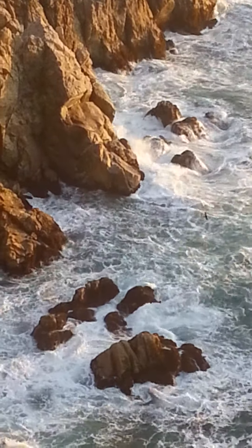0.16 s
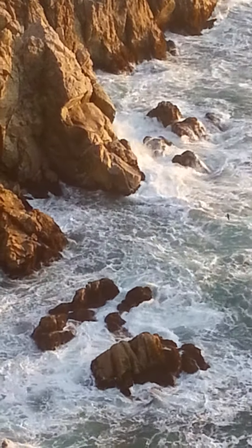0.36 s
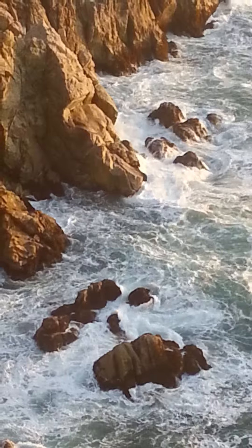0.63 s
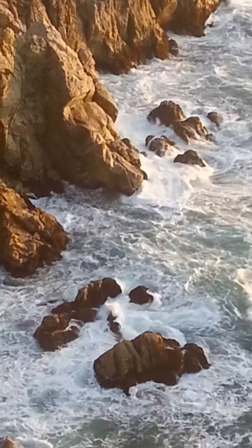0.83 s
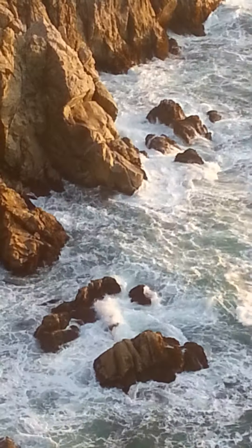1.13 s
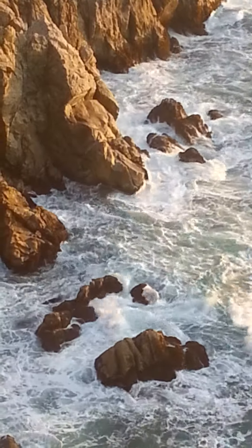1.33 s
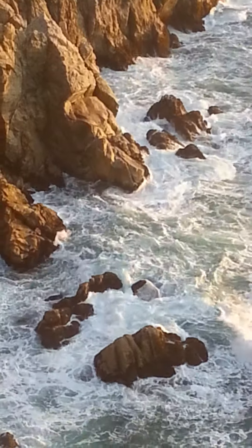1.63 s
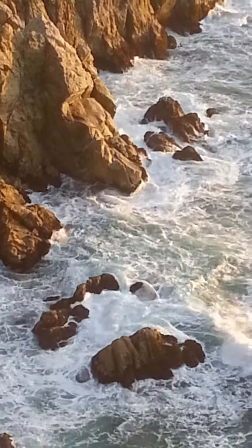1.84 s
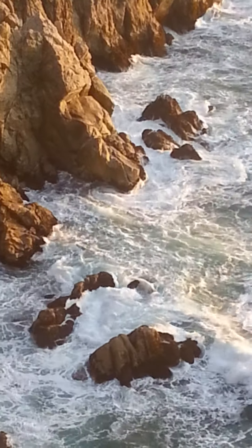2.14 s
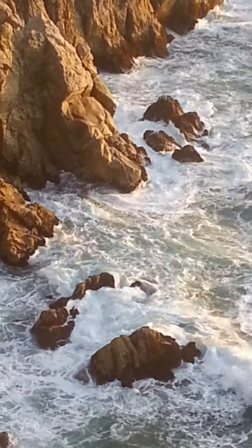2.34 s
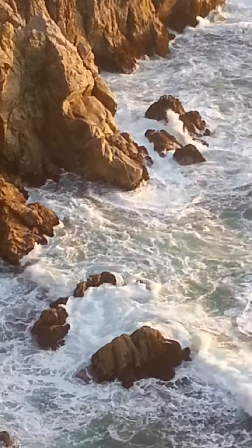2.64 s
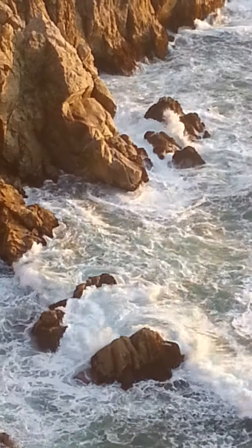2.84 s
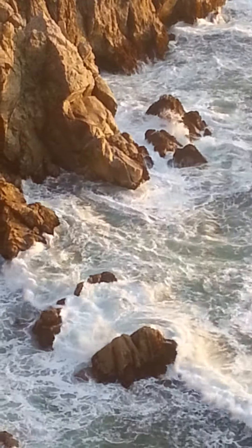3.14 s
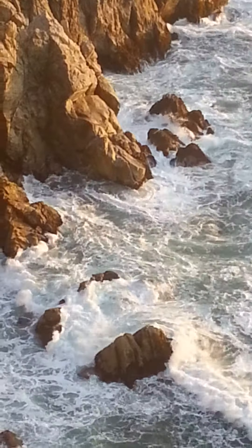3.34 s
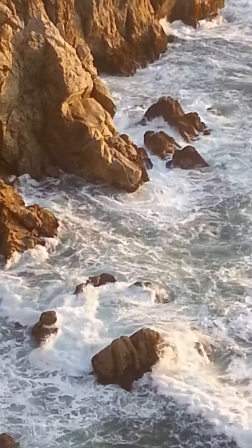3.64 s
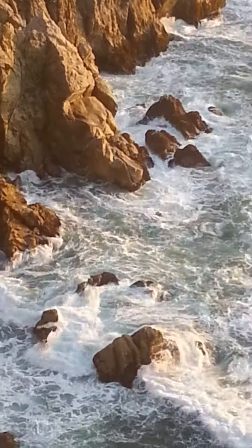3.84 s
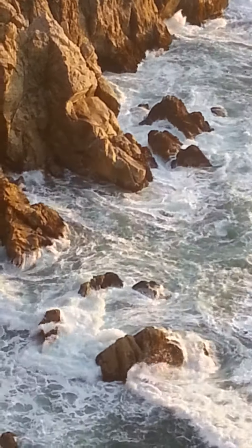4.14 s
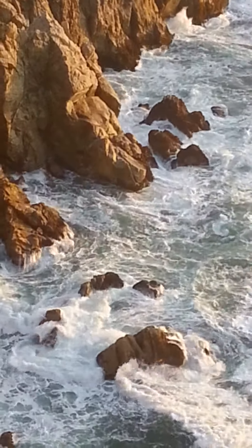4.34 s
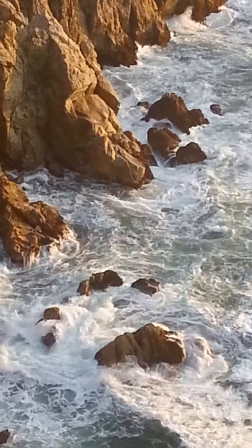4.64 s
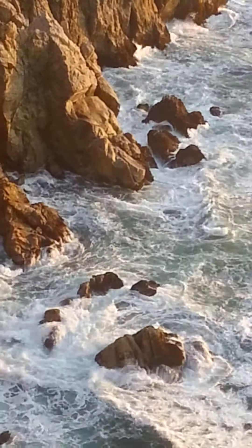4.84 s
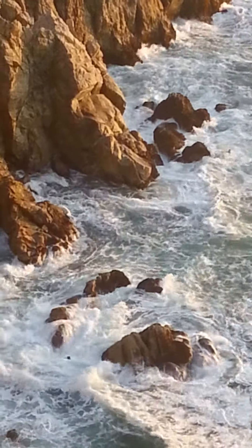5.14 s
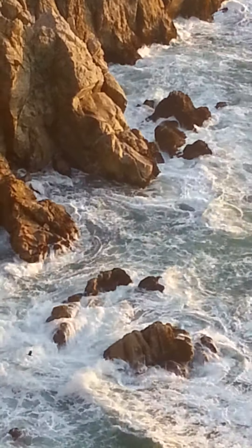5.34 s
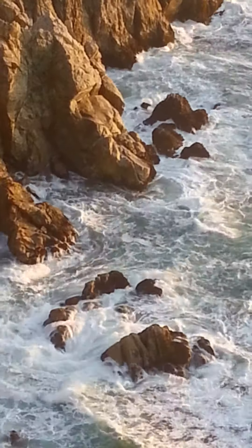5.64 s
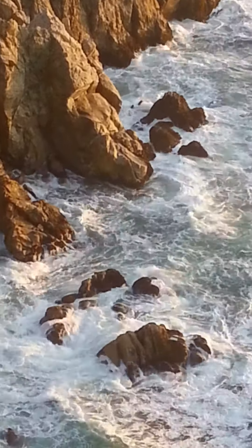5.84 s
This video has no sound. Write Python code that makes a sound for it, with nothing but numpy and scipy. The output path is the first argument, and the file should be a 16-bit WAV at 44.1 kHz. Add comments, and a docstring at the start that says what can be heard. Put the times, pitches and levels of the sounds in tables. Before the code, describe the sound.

Continuous foamy wash of sea around rocks, opening with a low surge, lulling, then rising, while brief microphone thumps jolt the right side.

```python
"""Surf foams around rocks far below a sea cliff, heard by a two-port microphone on the cliff top.
Five patches of white water, each of surging, fizzing noise, arrive directly and again off surfaces close
to the microphone, which combs the roar. Spray hisses from all sides, unrelated at the two ports.
A heavy low surge opens; the wash eases, lulls and builds again, with more rumble from the next set.
Four sharp pops, steps pulled back by bass cuts, jolt the right port only."""
import sys
import numpy as np
from scipy import signal
from scipy.fft import rfft, irfft
from scipy.io import wavfile
from scipy.ndimage import uniform_filter1d

SR = 44100
rng = np.random.default_rng(int(sys.argv[2]) if len(sys.argv) > 2 else 0)


def magnitude_from_level(level_db):
    """Linear magnitude for a level in decibels (20 dB per decade)."""
    exponent = np.asarray(level_db, float) / 20
    return 10 ** exponent


def dump(signal):
    """Clip the signal to [-1, 1] and save it as 16-bit WAV at the path in sys.argv[1]."""
    limited = np.clip(np.atleast_2d(signal).T, -1, 1)
    pcm = np.round(limited * 32767).astype(np.int16)
    wavfile.write(sys.argv[1], SR, pcm)


N = 264159
HZ = np.maximum(np.arange(N // 2 + 1) * SR / N, 1)


def walk(rate_hz):
    """Random levels held 1 / rate_hz s and slewed twice; spread about 0.7."""
    hold = int(SR / rate_hz)
    held = np.repeat(rng.standard_normal(N // hold + 1), hold)
    return uniform_filter1d(uniform_filter1d(held, hold), hold)[:N]


def lag(ms):
    """A delay as a spectrum: phase falling linearly with frequency."""
    return np.exp(-2j * np.pi * HZ * ms / 1000)


def foam(db, tilt_db, surge_db, fizz_db):
    """Spectrum of countless bursting bubbles: noise that surges slowly and fizzes quickly."""
    level_db = surge_db * walk(5.01) + fizz_db * walk(60.0)
    bursts = rng.standard_normal(N) * magnitude_from_level(level_db)
    return rfft(bursts) * magnitude_from_level(db + tilt_db * np.log2(HZ / 1000))


def white_water():
    """Each patch reaches both ports directly and by one short, dulled echo, which combs it."""
    # Each row: relative level at 1 kHz in dB, tilt in dB per octave, left lag behind right in ms,
    # echo delay left and right in ms, echo gain left and right (linear), echo dulls above in Hz.
    patches = [(-5.1, -2.6, 0.325, 0.72, 1.695, -1.3, 1.3, 4505),
               (8.1, -9.2, -0.034, 1.6, 1.644, -1.3, -0.87, 1146),
               (1.3, -10.0, 0.236, 0.615, 1.221, 0.69, 1.06, 16295),
               (6.9, -9.8, -0.028, 0.908, 2.042, -0.83, -0.48, 3324),
               (-12.6, 1.4, 0.142, 1.768, 1.475, 0.79, -1.3, 3162)]
    out = 0
    for db, tilt_db, left_ms, echo_l_ms, echo_r_ms, gain_l, gain_r, dull_hz in patches:
        dull = 1 / (1 + 1j * HZ / dull_hz)
        left = (1 + gain_l * dull * lag(echo_l_ms)) * lag(left_ms)
        right = 1 + gain_r * dull * lag(echo_r_ms)
        patch = foam(db, tilt_db, surge_db=0.84, fizz_db=0.97)
        out = out + patch * np.array([left, right])
    return out


def spray():
    """Hiss from all sides: independent treble-heavy foam at each port."""
    return np.array([foam(db=-17.5, tilt_db=7.1, surge_db=0.76, fizz_db=1.0) for _ in range(2)])


def ports():
    """Broad colour, narrow humps and dips and a cut of the deepest bass, for both ports."""
    # Overall colour at each port, with a steep treble loss above about 8 kHz.
    # Each row: frequency in Hz, left and right gain in dB.
    colour = [(24.9, -80, -82), (54.6, -54.5, -56.5), (126.3, -34.5, -35.5), (291, -18.5, -21),
              (573, -20.5, -17), (1696, -4, -12), (1960, -8, -5), (3350, 0.5, -4), (4730, -3, -6.5),
              (6170, -13.5, -15), (7550, -23.5, -10), (8355, -44, -18.5), (9460, -99, -32),
              (14060, -91, -55.5)]
    # Narrow humps and dips in each port's colour.
    # Each row: centre in Hz, width in Hz, left and right gain in dB.
    ripples = [(423, 47, 3, -2), (954, 90, .5, 3.5), (1190, 58, -1.5, 1), (1606, 165, 2, 3),
               (2400, 85, 2, 0.5), (2734, 90, -2, -3.5), (6030, 330, -3, 2.5)]
    bass_cut_hz = 25
    hz, *ports_db = np.transpose(colour)
    db = np.array([np.interp(np.log(HZ), np.log(hz), port_db) for port_db in ports_db])
    for centre_hz, width_hz, *ripple_db in ripples:
        bell = np.exp(-0.5 * ((HZ - centre_hz) / width_hz) ** 2)
        db = db + np.outer(ripple_db, bell)
    return magnitude_from_level(db) / (1 + (bass_cut_hz / HZ) ** 4)


def surf():
    """The swell moves the whole wash; rumble and hiss follow by their own share, roar opens with a surge."""
    # The wash eases, lulls and builds again. Each row: time in seconds, level in dB.
    swell = [(0.0, -27.5), (0.2, -30), (0.42, -28.5), (0.8, -30), (1.5, -30), (2.2, -31), (3.15, -32),
             (3.6, -31), (4.1, -30.5), (4.45, -30.5), (4.85, -29.5), (5.2, -30), (5.99, -30)]
    mid_swell_db = -30
    rumble_swing, hiss_swing = 0.38, 1.17  # dB per dB of swell
    rumble_hz, roar_hz, hiss_hz = 165, 550, 5500  # band edges
    surge_db, surge_end_s, surge_fade_s = 2.8, 0.52, 0.04  # heavy low surge at the start
    set_rumble_db, set_s, set_build_s = 2.5, 3.4, 0.2  # next set brings more rumble
    roar_level_db, hiss_level_db, hiss_drift_db_per_s = 0.27, 0.17, -0.05  # beside the wash

    sea = (white_water() + spray()) * ports()
    sea = sea / irfft(sea, N).std()
    # four shares of the spectrum that add up to one
    below = [1 / (1 + (HZ / edge_hz) ** 4) for edge_hz in (rumble_hz, roar_hz, hiss_hz)]
    shares = below[0], below[1] - below[0], below[2] - below[1], 1 - below[2]
    rumble, roar, wash, hiss = (irfft(sea * share, N) for share in shares)

    t = np.arange(N) / SR
    db = np.interp(t, *np.transpose(swell))

    def rise(at_s, over_s):
        """Smooth step from 0 to 1."""
        return 0.5 + 0.5 * np.tanh((t - at_s) / over_s)

    # band gains relative to the wash
    rumble_db = (rumble_swing - 1) * (db - mid_swell_db) + set_rumble_db * rise(set_s, set_build_s)
    roar_db = roar_level_db + surge_db * (1 - rise(surge_end_s, surge_fade_s))
    hiss_db = hiss_level_db + (hiss_swing - 1) * (db - mid_swell_db) + hiss_drift_db_per_s * t
    mix = wash + magnitude_from_level(rumble_db) * rumble + magnitude_from_level(roar_db) * roar + magnitude_from_level(hiss_db) * hiss
    return magnitude_from_level(db) * mix


def pops():
    """Sudden steps that the input's two bass cuts pull back through zero in a few ms."""
    # Each row: start in seconds, step height in dB.
    pop_rows = [(2.33235, -5.5), (2.35439, -6.4), (2.89194, -6.8), (4.19300, -4.7)]
    cut_hz, damping, leak_hz, top_hz = 97, 0.52, 110, 16000
    u = 1j * HZ / cut_hz
    step = SR / (2j * np.pi * HZ)
    resonant_cut = u * u / (1 + 2 * damping * u + u * u)
    leak_cut = 1 / (1 + leak_hz / (1j * HZ))
    top_cut = 1 / (1 + (HZ / top_hz) ** 24)
    starts = sum(magnitude_from_level(db) * lag(1000 * s) for s, db in pop_rows)
    return irfft(step * resonant_cut * leak_cut * top_cut * starts, N)


def scene():
    """Surf on both ports, pops on the right."""
    return surf() + pops() * np.array([[0], [1]])


def band_limit(x):
    """A steep low-pass at the top of the band."""
    return signal.sosfilt(signal.butter(12, 14650, fs=SR, output="sos"), x)


def record(dry):
    """The finished mix as stored."""
    return band_limit(dry)


dry = scene()
out = record(dry)
dump(out)
```